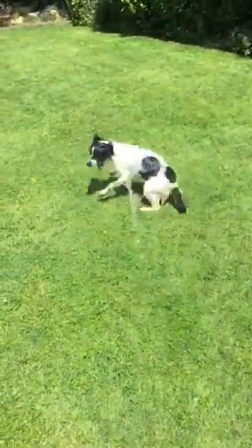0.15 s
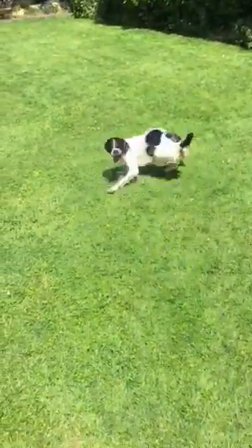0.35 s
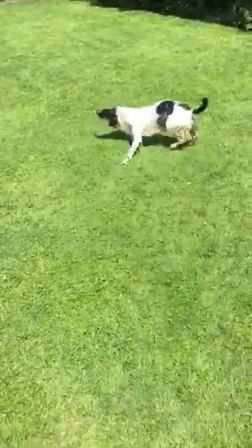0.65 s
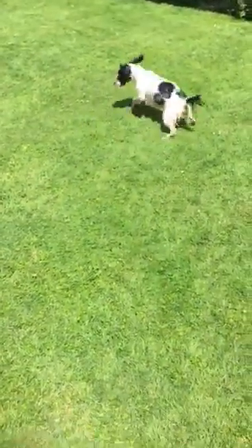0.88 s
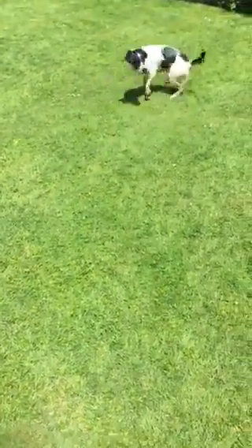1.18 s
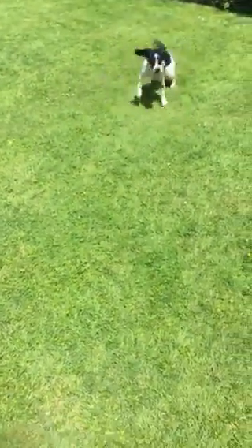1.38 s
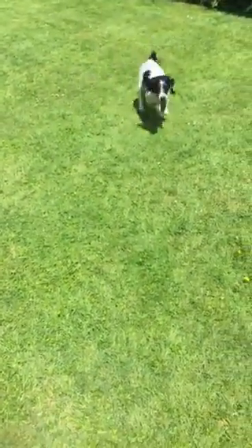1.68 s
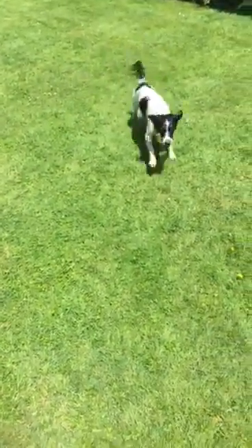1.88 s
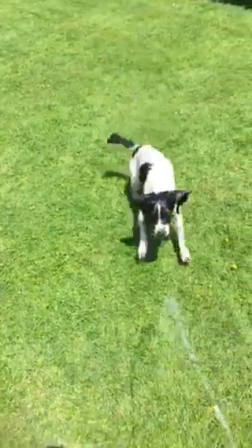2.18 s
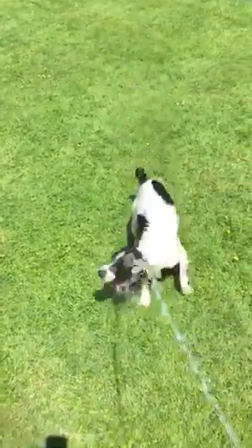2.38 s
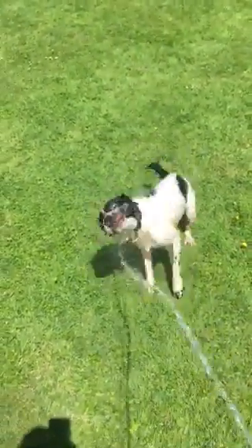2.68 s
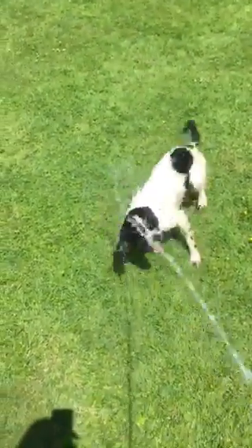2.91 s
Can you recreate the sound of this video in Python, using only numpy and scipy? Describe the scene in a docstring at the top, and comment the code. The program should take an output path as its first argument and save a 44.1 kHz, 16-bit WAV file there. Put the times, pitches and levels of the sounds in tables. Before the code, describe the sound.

Hose water spatters on lawn in uneven bright bursts with sharp drop ticks, soft paw thuds and a late flurry of hollow splats on a dog; open garden, handheld microphone, low motor drone beneath.

```python
"""Over a low hum and a faint outdoor rumble, a garden hose starts weakly: fine drops, mist and lower, fatter drops.
Within 0.4 s the jet hits a dog: noise bursts and sagging tones make wet, hollow splats; damped sines thud as its paws.
After a lull near 0.6 s the water returns in strong spurts: ringing clicks for drops, coloured noise for mist.
A splat comes near 1.6 s, paws again near 2.4 s, and a flurry of splats from 2.6 s almost to the end."""
import sys
import numpy as np
from scipy import signal
from scipy.fft import rfft, irfft
from scipy.io import wavfile
from scipy.ndimage import uniform_filter1d

SR = 44100
rng = np.random.default_rng(int(sys.argv[2]) if len(sys.argv) > 2 else 0)


def pcm_store(signal):
    """Save signal as 16-bit PCM."""
    levels = np.round(np.clip(np.atleast_2d(signal), -1, 1) * 32767)
    wavfile.write(sys.argv[1], SR, levels.astype(np.int16).T)


N = 134505
T = np.arange(N) / SR


def from_db(db):
    """Decibels to gain."""
    return 10 ** (np.asarray(db) / 20)


def rms_one(x):
    """Scale to unit rms."""
    return x / np.sqrt(np.mean(x ** 2) + 1e-20)


def in_time(rows):
    """Join the rows of a curve by straight lines; one signal per column."""
    start_s, *columns = np.transpose(rows)
    return [np.interp(T, start_s, column) for column in columns]


def coloured(x, points):
    """Causal (minimum-phase) filter with the given relative spectrum; rms 1."""
    size = 2048
    hz, db = np.transpose(points)
    grid_hz = np.maximum(np.arange(size // 2 + 1) * SR / size, 1)
    gain = from_db(np.interp(np.log(grid_hz), np.log(hz), db))
    # folding the cepstrum makes the phase minimum
    cepstrum = irfft(np.log(gain))
    cepstrum[1:size // 2] *= 2
    cepstrum[size // 2 + 1:] = 0
    impulse = irfft(np.exp(rfft(cepstrum)))
    return rms_one(signal.fftconvolve(x, impulse)[:N])


def steadied(x):
    """Hold the flow even over some 30 ms, keeping the single drops."""
    power = np.abs(uniform_filter1d(x ** 2, size=1400))
    return x / np.sqrt(power + 1e-9)


def resonance(x, hz, q):
    """A steep-sided resonance (two equal peaks in series); rms 1."""
    peak = signal.iirpeak(hz, q, fs=SR)
    return rms_one(signal.lfilter(*peak, signal.lfilter(*peak, x)))


def ring(clicks, hz, t60_s):
    """Each click sets a short damped tone ringing."""
    radius = from_db(-60 / (t60_s * SR))
    angle = 2 * np.pi * hz / SR
    poles = [1, -2 * radius * np.cos(angle), radius ** 2]
    return signal.lfilter([.5, 0, -.5], poles, clicks + 1e-18)


# outdoor air: pitch_hz, relative_db
AIR_COLOUR = [(20,-29),(35,-29),(55,-0.5),(95,-7),(190,-9),(280,-8),(420,-16),(1000,-18.5),(2200,-23.5),(5000,-32.5),(15500,-32.5)]
AIR_DB = -58.5


def air():
    """Steady outdoor noise, strongest in the bass."""
    return from_db(AIR_DB) * coloured(rng.standard_normal(N), AIR_COLOUR)


# air on the microphone: start_s, level_db
RUMBLE = [(0,-52),(0.25,-59.5),(0.45,-52.5),(0.65,-69),(1.3,-59.5),(2.2,-68),(2.7,-51),(3.04,-61)]
# its spectrum: pitch_hz, relative_db
RUMBLE_COLOUR = [(15,-23),(32,-7),(55,1),(95,-10),(200,-10),(300,-18.5),(800,-63)]


def rumble():
    """Air on the microphone: low noise that rises and falls."""
    level_db, = in_time(RUMBLE)
    return from_db(level_db) * coloured(rng.standard_normal(N), RUMBLE_COLOUR)


# motor hum: start_s, pitch_hz, level_db (rms of the fundamental)
HUM = [(0,123.2,-54.5),(0.4,123.2,-53),(0.6,123.1,-54.5),(1.33,121.8,-54.5),(1.95,121,-54),(2.45,121.2,-49),(2.8,120.5,-47.5),(3.04,119.5,-54)]
# its partials: multiple, relative_db
HUM_PARTIALS = [(1,0),(2,-14)]
HUM_WAVER_DB = 1.0


def hum():
    """A distant motor drones, sagging slightly in pitch; each partial wavers in level."""
    pitch_hz, level_db = in_time(HUM)
    phase = 2 * np.pi * np.cumsum(pitch_hz) / SR
    out = np.zeros(N)
    for multiple, relative_db in HUM_PARTIALS:
        waver = np.interp(T, np.linspace(0, T[-1], 50), rng.standard_normal(50))
        rms = from_db(level_db + relative_db + HUM_WAVER_DB * waver)
        out += np.sqrt(2) * rms * np.sin(multiple * phase)
    return out


ECHO_DB, ECHO_ATTACK_S, ECHO_DECAY_S, ECHO_CUTOFF_HZ = -22.5, 0.0044, 0.051, 4050


def garden(x):
    """Hedge and house return a faint, dull tail of reflections."""
    t = T[:SR // 2]
    shape = np.exp(-t / ECHO_DECAY_S) * (1 - np.exp(-t / ECHO_ATTACK_S))
    lowpass = signal.butter(2, ECHO_CUTOFF_HZ, fs=SR, output="sos")
    tail = signal.sosfilt(lowpass, rng.standard_normal(len(t)) * shape)
    tail /= np.sqrt(np.sum(tail ** 2))
    return from_db(ECHO_DB) * signal.fftconvolve(x, tail)[:N]


# paws on the turf: start_s, pitch_hz, peak_db, decay_s
PAWS = [(0.285,195,-48,0.021),(0.372,126,-45,0.02),(0.394,75,-51,.025),(0.435,63,-45,0.034),(0.485,76.6,-45.5,.024),(2.411,457,-44.5,0.0088),(2.425,195,-37.5,0.012)]
PAW_ATTACK_S = 0.0041


def paws():
    """Paws thud softly in the turf: damped low sines."""
    out = np.zeros(N)
    for start_s, pitch_hz, peak_db, decay_s in PAWS:
        t = np.maximum(T - start_s, 0)
        shape = (1 - np.exp(-t / PAW_ATTACK_S)) ** 2 * np.exp(-t / decay_s)
        out += from_db(peak_db) * shape / shape.max() * np.sin(2 * np.pi * pitch_hz * t)
    return out


# jet on the dog: start_s, hollow_hz, hollow_db, slap_hz, slap_db, decay_s
SPLATS = [(0.1824,693,-43.5,1780,-36.5,0.0032),(0.346,1204,-33.5,2750,-37,0.0048),(0.381,993,-50,3580,-48,0.015),(1.556,1054,-39,1900,-44,.008),(1.565,1320,-35.5,3100,-47,0.0048),(2.5978,1284,-34,2440,-32.5,0.0058),(2.61,1603,-50,4100,-43,0.0098),(2.633,622,-40,2100,-45.5,0.022),(2.659,680,-43,2000,-47,0.018),(2.675,1196,-36,1900,-40.5,0.0066),(2.677,679,-40.5,5100,-33,0.0038),(2.758,1583,-46,1920,-39,0.0066),(2.7626,1180,-41,3470,-27.5,0.0049),(2.772,690,-32,3200,-46,0.0024),(2.934,956,-35.5,2600,-35.5,0.0064),(2.945,1450,-39,3180,-39,0.002),(2.97,960,-45,2170,-52,0.0096)]
SPLAT_ATTACK_S, SPLAT_GRAIN_DB = 0.00075, 4
HOLLOW_Q, SLAP_Q = 1.95, 1.25
HOLLOW_SAG_PER_S, HOLLOW_TONE_SHARE = 2.06, 0.45  # share of power


def splats():
    """A slug of water bursts into a bright, grainy slap and a hollow plop that sags in pitch."""
    out, t = np.zeros(N + SR), T[:SR // 10]
    for start_s, hollow_hz, hollow_db, slap_hz, slap_db, decay_s in SPLATS:
        shape = (1 - np.exp(-t / SPLAT_ATTACK_S)) * np.exp(-t / decay_s)
        grain = from_db(SPLAT_GRAIN_DB * np.minimum(rng.exponential(1, len(t)), 2))
        burst = shape * rng.standard_normal(len(t)) * grain
        slap = resonance(burst, slap_hz, SLAP_Q)
        gurgle = resonance(burst, hollow_hz, HOLLOW_Q)
        sagging_hz = hollow_hz * np.exp(-HOLLOW_SAG_PER_S * t)
        plop = rms_one(shape * np.sin(2 * np.pi * np.cumsum(sagging_hz) / SR))
        hollow = np.sqrt(HOLLOW_TONE_SHARE) * plop + np.sqrt(1 - HOLLOW_TONE_SHARE) * gurgle
        splat = from_db(slap_db) * slap + from_db(hollow_db) * hollow
        # levels refer to the energy spread over decay_s
        out[int(start_s * SR):][:len(t)] += np.sqrt(decay_s / t[-1]) * splat
    return out[:N]


SCATTER_DECAY_S = 0.00083


def scattered(x, share):
    """Each drop breaks into droplets: a brief shower follows the impact."""
    t = T[:400]
    shower = rng.standard_normal(len(t)) * np.exp(-t / SCATTER_DECAY_S)
    shower *= share / np.sqrt(np.sum(shower ** 2))
    shower[0] = 1  # the impact itself
    return signal.fftconvolve(x, shower)[:len(x)]


# single hard drops: start_s, peak_db (before the trim), pitch_hz
HARD_DROPS = [(0.002,-32,9050),(0.012,-19,6940),(0.079,-32,9800),(0.1825,-12.5,11400),(0.252,-44,9000),(0.3042,-29,8140),(0.313,-24,9200),(0.34,-19.5,4200),(0.3504,-12.5,9200),(0.357,-31,10000),(0.3765,-20,7000),(0.3959,-22.5,6700),(0.602,-39,3630),(0.857,-18,4930),(0.883,-31,9000),(0.9299,-16,7200),(1.0163,-20.5,9000),(1.0333,-17,6010),(1.0678,-13,12000),(1.2429,-16.5,8700),(1.2858,-14,9200),(1.3278,-17.5,8060),(1.5834,-18.5,4500),(1.351,-21.5,13000),(1.9645,-13,6900),(2.0225,-19,6500),(2.169,-23,5960),(2.4,-18,9800),(2.407,-33,5700),(2.4163,-22,6100),(2.4219,-16.5,6000),(2.4308,-15,9000),(2.4502,-11,5500),(2.4988,-17.5,9900),(2.516,-25,7000),(2.638,-22.5,3600),(2.7067,-19,11100),(2.7672,-25,3500),(2.8743,-15.5,11400)]
HARD_TRIM_DB, HARD_CYCLES, HARD_SCATTER_SHARE = 0.5, 3.7, 0.85  # cycles to -60 dB


def hard_drops():
    """Large drops land with a sharp tick: a few ringing cycles and a shower of droplets."""
    out = np.zeros(N + SR)
    for start_s, peak_db, pitch_hz in HARD_DROPS:
        tone = ring(signal.unit_impulse(1024), pitch_hz, HARD_CYCLES / pitch_hz)
        tick = scattered(tone, HARD_SCATTER_SHARE)
        tick *= from_db(peak_db + HARD_TRIM_DB) / np.abs(tick).max()
        out[int(start_s * SR):][:len(tick)] += tick
    return out[:N]


DROP_SCATTER_SHARE = 0.93


def drops(per_s, spread_db, cycles, low_hz, high_hz, count=24):
    """Random impacts, many small and few large, each ringing a few cycles at one of many pitches."""
    sizes = from_db(spread_db * np.minimum(rng.exponential(1, N), 3.5))
    signs = rng.choice([-1, 1], N)
    clicks = sizes * signs * (rng.random(N) < per_s / SR)
    dealt = rng.integers(0, count, N)
    out = np.zeros(N)
    for k, hz in enumerate(np.geomspace(low_hz, high_hz, count)):
        tones = ring(clicks * (dealt == k), hz, cycles / hz)
        out += hz * scattered(tones, DROP_SCATTER_SHARE)
    return out


CLUMPS_PER_S, CLUMP_DB, CLUMP_POWER_DECAY_S = 220, 9.0, 0.0009


def clumps():
    """The jet breaks into beads: each one briefly swells the spatter as it lands."""
    beads = (rng.random(N) < CLUMPS_PER_S / SR) * rng.uniform(0, 2, N)
    decay = np.exp(-1 / (CLUMP_POWER_DECAY_S * SR))
    power = signal.lfilter([1], [1, -decay], beads + 1e-18)
    return rms_one(np.sqrt(1 + from_db(CLUMP_DB) ** 2 * power))


# fine spray by spurt: start_s, level_db (before the trims)
SPRAY = [
    [(0,-51),(0.02,-46),(0.03,-60),(0.045,-58),(0.076,-62)],
    [(0.08,-48),(0.118,-47.5),(0.15,-51),(0.175,-59),(0.195,-55),(0.244,-64)],
    [(0.248,-47.5),(0.288,-54),(0.32,-46.5),(0.35,-36),(0.39,-43.5),(0.41,-42.5),(0.46,-55),(0.52,-67.5),(0.735,-68)],
    [(0.738,-49.5),(0.785,-36),(0.855,-32),(0.9,-41.5),(0.93,-36),(1.07,-33.5),(1.13,-37.5),(1.18,-63),(1.237,-66)],
    [(1.24,-31),(1.27,-41.5),(1.29,-35),(1.33,-36.5),(1.35,-49.5),(1.375,-59),(1.41,-70),(1.469,-65)],
    [(1.472,-32),(1.48,-34),(1.49,-39),(1.585,-33),(1.622,-37.5),(1.64,-54),(1.66,-62),(1.704,-68)],
    [(1.707,-37.5),(1.713,-30),(1.731,-40.5),(1.747,-38),(1.77,-33),(1.872,-41.5),(1.895,-60),(1.914,-68)],
    [(1.916,-37),(2.02,-35),(2.075,-41.5),(2.095,-56.5),(2.12,-41),(2.155,-48.5)],
    [(2.162,-35),(2.18,-40.5),(2.235,-32),(2.27,-45.5),(2.32,-51),(2.39,-38),(2.42,-34),(2.48,-36),(2.515,-30),(2.56,-60.5),(2.595,-41)],
    [(2.6,-39.5),(2.635,-35.5),(2.667,-45.5),(2.678,-37.5),(2.697,-45.5),(2.715,-35.5),(2.755,-46.5),(2.767,-34),(2.785,-55),(2.83,-51)],
    [(2.868,-50),(2.893,-38),(2.91,-47.5),(2.948,-41.5),(2.962,-59),(3.04,-59.5)],
]
# fat drops by spurt: start_s, level_db (before the trim)
PATTER = [
    [(0,-57.5),(0.07,-59.5),(0.12,-57),(0.24,-58.5),(0.32,-60.5),(0.35,-51.5),(0.43,-52.5),(0.5,-65.5),(0.735,-68)],
    [(0.74,-60),(0.845,-35.5),(0.9,-64),(0.925,-47.5),(1.0,-44.5),(1.037,-47.5),(1.13,-49.5),(1.19,-75),(1.237,-70)],
    [(1.24,-36),(1.265,-53.5),(1.323,-40.5),(1.37,-73),(1.469,-61)],
    [(1.474,-43),(1.49,-53),(1.55,-39),(1.567,-37),(1.6,-55),(1.615,-43),(1.655,-100),(1.704,-76)],
    [(1.708,-56),(1.728,-36),(1.77,-44),(1.8,-42.5),(1.817,-38),(1.84,-63),(1.9,-71),(1.914,-70)],
    [(1.917,-44.5),(1.995,-41),(2.105,-63),(2.22,-57),(2.31,-54.5),(2.42,-46.5),(2.507,-47),(2.557,-62),(2.595,-51)],
    [(2.605,-41.5),(2.68,-44),(2.7,-53.5),(2.75,-44),(2.79,-54),(2.85,-52.5),(2.9,-45.5),(2.945,-46),(2.965,-65),(3.04,-59)],
]
# spectra: pitch_hz, relative_db
FINE_COLOUR = [(250,-15),(1000,-6),(2500,-14),(3700,-1),(4900,-5),(5900,3.5),(7300,-1.5),(9000,2),(10300,-4.5),(11700,-1.5),(15500,-3.5)]
FAT_COLOUR = [(200,-17),(350,1.5),(480,-7.5),(750,-3),(1150,0),(1550,-1),(2000,2),(3200,1.5),(5000,-4),(9000,-20.5)]
MIST_COLOUR = [(250,-19.5),(1000,-6),(3000,-2),(6000,-3),(9000,1),(12000,1.5),(15500,-7)]
FINE_TRIM_DB, FAT_TRIM_DB, MIST_TRIM_DB = -1, -1, -5.5


def spatter():
    """Fine ringing drops and mist noise follow the spray; fat drops patter below them."""
    spray_db, = in_time(np.vstack(SPRAY))
    patter_db, = in_time(np.vstack(PATTER))
    fine = drops(per_s=3600, spread_db=3, cycles=3.3, low_hz=3000, high_hz=15500)
    fine = steadied(coloured(fine, FINE_COLOUR))
    fat = drops(per_s=1600, spread_db=4, cycles=7.8, low_hz=342, high_hz=4500)
    fat = steadied(coloured(fat, FAT_COLOUR))
    mist = coloured(rng.standard_normal(N), MIST_COLOUR)
    landing = from_db(spray_db + FINE_TRIM_DB) * fine + from_db(patter_db + FAT_TRIM_DB) * fat
    return clumps() * landing + from_db(spray_db + MIST_TRIM_DB) * mist


def scene():
    """Water and dog over the hum and the outdoor air; only the water echoes."""
    water = spatter() + hard_drops() + splats()
    background = air() + rumble() + hum()
    return (background + paws() + water + garden(water))[None]


CUTOFF_HZ = 15900


def record(dry):
    """The microphone drops the deep bass; the top is cut steeply."""
    highpass = signal.butter(2, 27, "high", fs=SR, output="sos")
    lowpass = signal.ellip(10, .2, 80, CUTOFF_HZ, fs=SR, output="sos")
    return signal.sosfilt(lowpass, signal.sosfilt(highpass, dry))


dry = scene()
out = record(dry)
pcm_store(out)
```